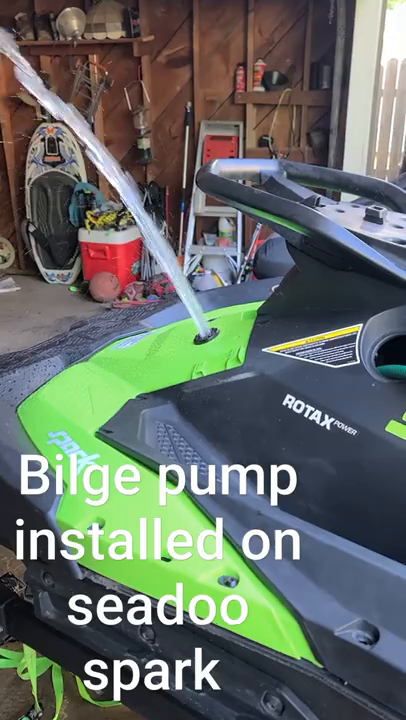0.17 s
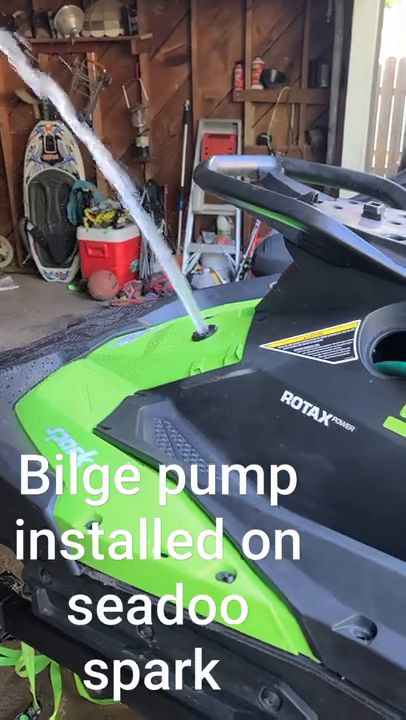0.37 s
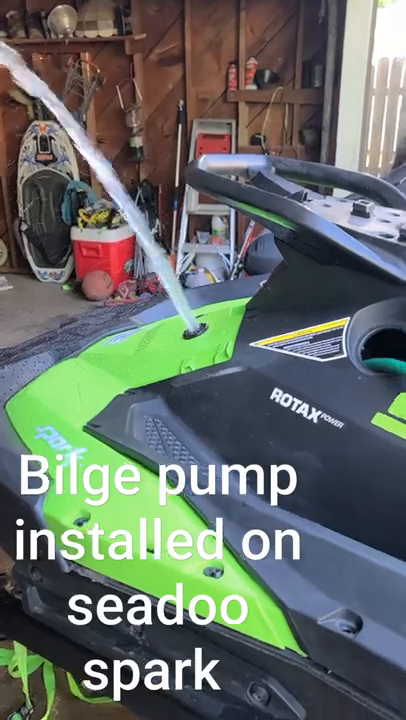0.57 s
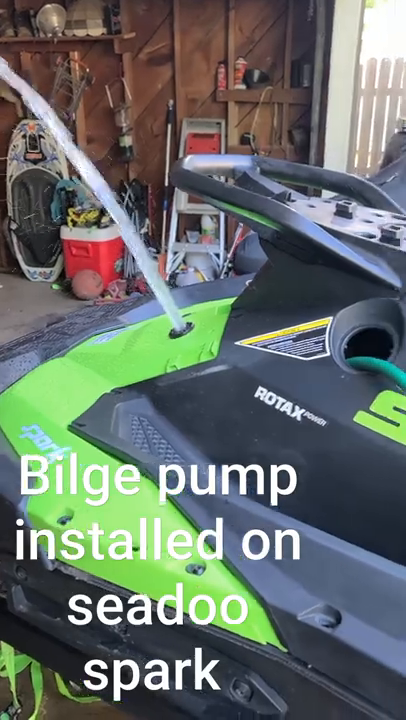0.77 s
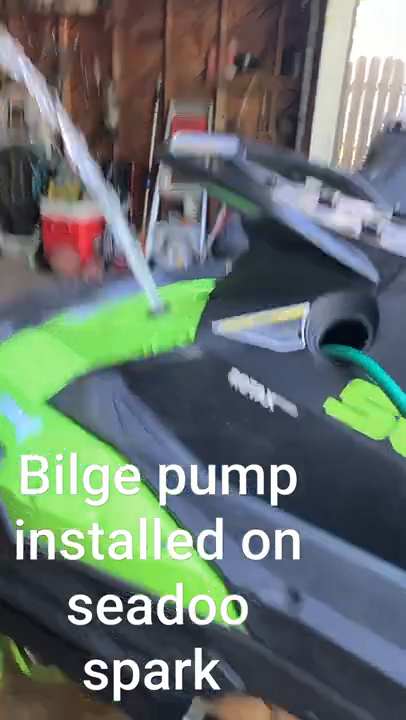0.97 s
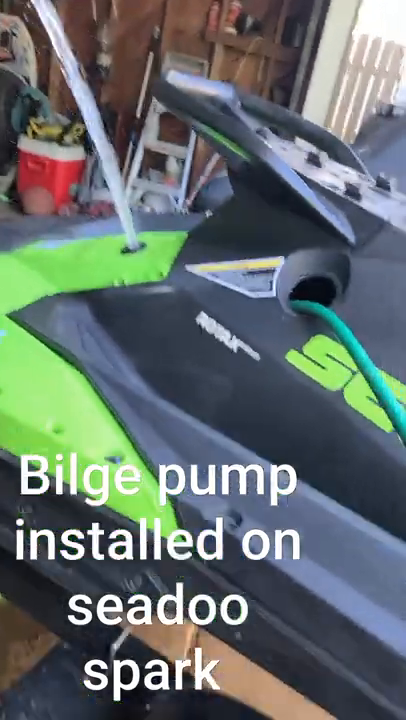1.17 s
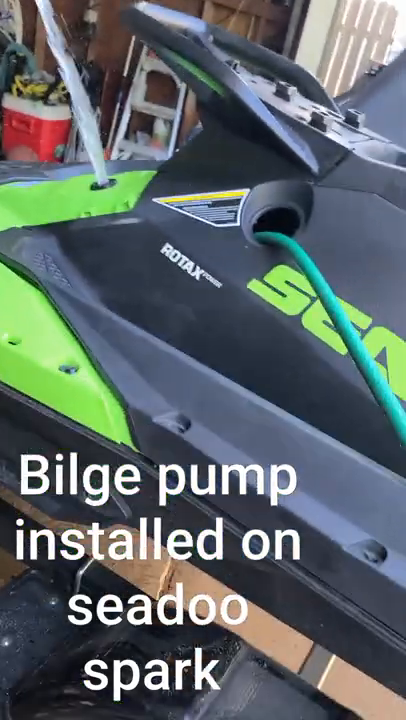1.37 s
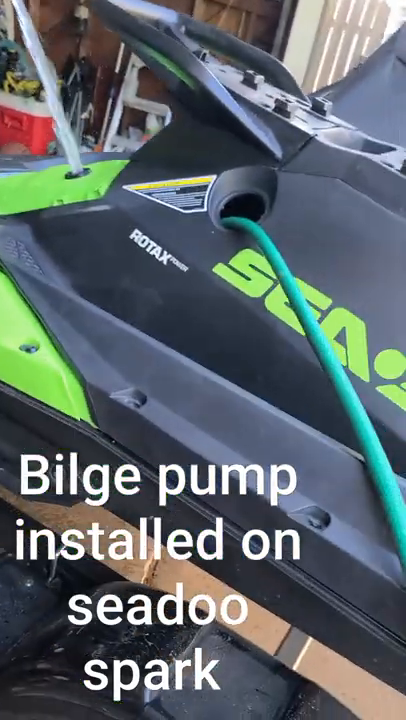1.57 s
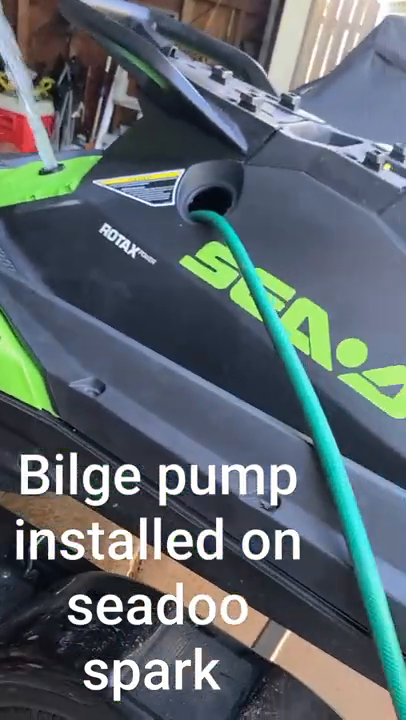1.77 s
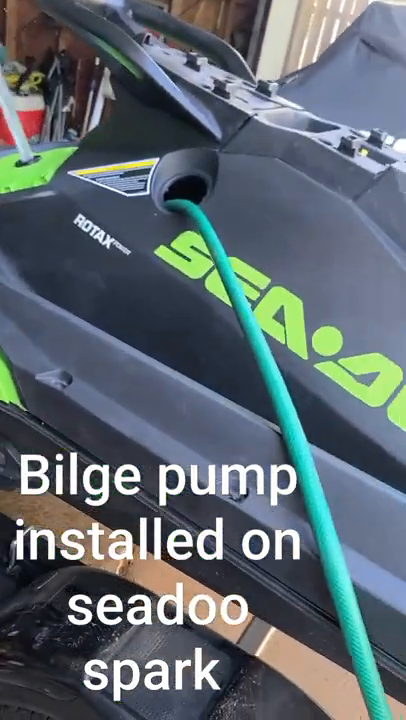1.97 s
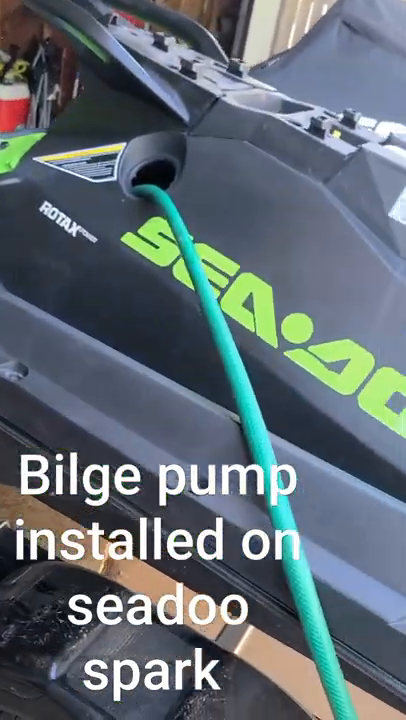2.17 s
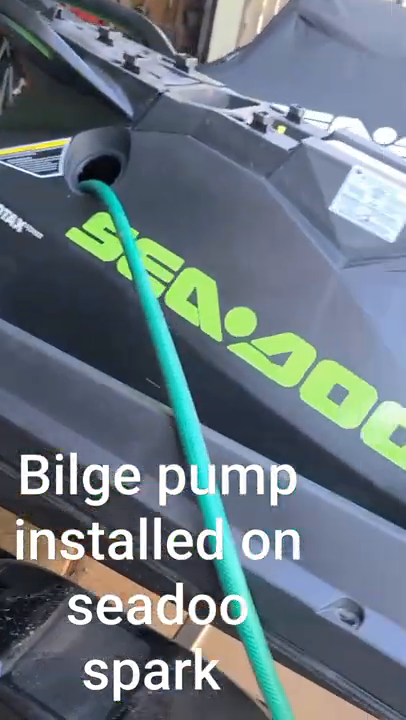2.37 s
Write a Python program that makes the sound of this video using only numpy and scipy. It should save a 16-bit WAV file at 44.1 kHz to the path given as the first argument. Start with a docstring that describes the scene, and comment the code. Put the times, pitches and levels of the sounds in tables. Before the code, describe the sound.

Water from a pump splashes continuously on concrete from 0 to 2.5 seconds, close and bright. Irregular slugs land many times a second, each a sharp crack and wet slap with a tiny bubbly gulp and scattering spatter, over steady spray hiss and droplet patter. Hard garage walls add diffuse echoes. Faint low hum swells come and go; the hand-held recorder is knocked at about 1.0 and 1.1 seconds.

```python
"""Hand-held stereo recorder close to a concrete garage floor, where a pump's arc of water breaks up and lands.
From the start fine spray hisses and droplets patter as short rings; slugs of water slap down throughout.
Each slug cracks, traps a gulp of air that rings briefly and throws spatter; the walls answer as decaying noise.
A low hum, a plain sine, then swells now and then, and later the recorder is knocked: a thud and a tick."""
import sys
import numpy as np
from scipy import signal
from scipy.io import wavfile
from scipy.ndimage import map_coordinates

SR = 44100
rng = np.random.default_rng(int(sys.argv[2]) if len(sys.argv) > 2 else 0)


def put_to_file(sound):
    """Save the sound as 16-bit audio at rate SR, in the file named by the first command-line argument."""
    columns = np.atleast_2d(sound).T  # one column per channel
    safe = np.clip(columns, -1, 1)
    whole_steps = np.round(safe * 32767)
    wavfile.write(sys.argv[1], SR, whole_steps.astype(np.int16))


N = 110691


def amp(db):
    """Decibels to amplitude."""
    return 10 ** (np.asarray(db) / 20)


def rms_one(x):
    """Scale to an RMS of 1."""
    return x / np.sqrt(np.mean(x ** 2) + 1e-20)


def at_hz(points, hz):
    """Read a (Hz, value) curve, straight along log frequency."""
    curve_hz, values = np.array(points).T
    return np.interp(np.log(hz), np.log(curve_hz), values)


def band(x, low_hz, high_hz):
    """Band-pass, kept inside the usable range."""
    edges = [max(low_hz, 10), min(high_hz, .45 * SR)]
    return signal.sosfilt(signal.butter(2, edges, "band", fs=SR, output="sos"), x)


def drift(rate_hz):
    """Smooth random wander of RMS 1: noise through two equal one-pole low-passes."""
    r = np.exp(-2 * np.pi * rate_hz / SR)
    wander = signal.lfilter([1], [1, -2 * r, r * r], rng.standard_normal(N + SR))
    return rms_one(wander[SR:])  # the first second lets the filter settle


def ring(clicks, hz, t60_s):
    """A resonator: a unit click sets a decaying sine of height 1 ringing."""
    r, w = amp(-60 / (t60_s * SR)), 2 * np.pi * hz / SR
    return signal.lfilter([0, np.sin(w)], [1, -2 * r * np.cos(w), r * r], clicks + 1e-18)


def clicks(start_s, level_db):
    """Single-sample clicks at the given times."""
    out = np.zeros(N)
    np.add.at(out, np.minimum((np.asarray(start_s) * SR).astype(int), N - 1), amp(level_db))
    return out


# Spectrum of fine spray and background noise: band_hz [Hz], density_db [dB per Hz, relative]
SPRAY_SPECTRUM = [(35, -3), (60, 8.5), (200, -4), (380, 4), (550, -4), (1200, -16), (2600, 2.5), (4000, -6),
                  (9000, -0.5), (11000, -34), (16000, -8)]
# How alike the left and right noise are: band_hz [Hz], likeness [0 unrelated, 1 same]
STEREO_LIKENESS = [(60, .85), (200, .58), (700, 0), (15000, 0)]
SPRAY_DB = -35  # RMS over both channels, before the stereo tilt


def spray(patchy_db):
    """Half-octave bands of stereo noise, each with its own level, flicker and likeness."""
    out, together = 0, drift(11.0)
    edges = 28 * 2 ** np.arange(0, 9.6, .5)
    white = rng.standard_normal((2, 2, N))  # neighbouring bands use different noise
    for k, (low, high) in enumerate(zip(edges, edges[1:])):
        mid, side = band(white[k % 2], low, high)
        hz = np.sqrt(low * high)
        alike = np.clip(at_hz(STEREO_LIKENESS, hz), -1, 1)
        flicker_db = patchy_db * min(1, hz / 1500) * (.5 * together + drift(66))
        gain = amp(at_hz(SPRAY_SPECTRUM, hz) + flicker_db)
        stereo = np.sqrt(1 + alike) * mid + np.sqrt(1 - alike) * side * [[1], [-1]]
        out = out + gain * stereo
    return amp(SPRAY_DB) * rms_one(out)


DROPS_PER_S, DROPS_DB, DROP_SPREAD_DB = 1100, -46, 1.5  # typical rate, overall RMS, spread of sizes
DROP_HZ = (1620, 14000)  # lowest_hz, highest_hz [Hz] of the ringing drops


def droplets():
    """Small drops land at random; each ring falls 60 dB in 3.7 cycles."""
    sizes = amp(DROP_SPREAD_DB * np.minimum(rng.exponential(1, N), 5)) * rng.choice([-1, 1], N)
    born = rng.random(N) < DROPS_PER_S * amp(2 * drift(8)) / SR
    pitches, dealt = np.geomspace(*DROP_HZ, 14), rng.integers(0, 14, N)
    rings = sum(ring(sizes * born * (dealt == k), hz, 3.7 / hz) for k, hz in enumerate(pitches))
    return amp(DROPS_DB) * rms_one(rings)


SPOTS = 4  # places on the floor where water lands, each with its own echoes
# Bands [Hz], trims added to the listed levels [dB], spatter against its burst [dB]
CRACK_HZ, CRACK_DB, CRACK_SPATTER_DB = (5880, 19100), -7.5, -15.5
SLAP_HZ, SLAP_DB, SLAP_SPATTER_DB = (2685, 6160), 4.5, -12.5
GULP_SPAN, GULP_DB, GULP_SPATTER_DB = (.58, 1.84), 4, -11.5  # band as multiples of the pitch
CRACK_S, SLAP_S, GULP_S, RISE_S = .0007, .0008, .0019, .0003  # decay times and the common rise
# The bubble climbs from this share of its pitch; tone is its strength against the noise
GULP_START, GULP_CLIMB_S, GULP_TONE = .6, .0012, 1.3
# Ringing drops per cycle of the band's low edge, their size spread, cycles to fall 60 dB, mist under them
SPATTER_PER_CYCLE, SPATTER_SPREAD_DB, SPATTER_CYCLES, SPATTER_MIST = .6, 2.5, 10, .7
SPATTER_S = 0.037  # decay time of the thrown spatter
# Slugs landing on the concrete, levels before the trims above:
# start_s [s], crack_db [dB], gulp_db [dB], slap_db [dB], pitch_hz [Hz, of the gulp]
SLUG_LANDINGS = [(0.002, -5, -23.5, -28, 1680), (0.027, -2, -20, -22.5, 1840),
                 (0.051, -11, -46, -29.5, 1200), (0.115, -2, -60, -27.5, 1910),
                 (0.146, -13.5, -61, -56, 1910), (0.211, -5, -29, -23, 1054),
                 (0.252, -10, -21.5, -27, 5100), (0.306, -27, -29.5, -28.5, 2320),
                 (0.3275, -4.5, -31, -45, 3720), (0.361, -8.5, -60, -41, 1900),
                 (0.386, -5, -26.5, -26.5, 2130), (0.41, -10.5, -26.5, -25.5, 1070),
                 (0.525, -1.5, -22, -23, 1210), (0.547, -3.5, -20.5, -23.5, 1500),
                 (0.631, -8.5, -29, -54, 2040), (0.652, -34, -19, -53, 2190),
                 (0.661, 0.5, -22.5, -40, 1420), (0.672, -33, -37, -48, 1450),
                 (0.688, -20, -25, -19.5, 975), (0.6935, -36, -20.5, -22.5, 1470),
                 (0.708, -4, -21.5, -37, 2180), (0.738, -2.5, -54, -23, 1330),
                 (0.758, -7.5, -29, -63, 2080), (0.892, -0.5, -64, -51, 1940),
                 (0.923, -8, -27.5, -27.5, 1740), (1.012, -7.5, -17, -27.5, 1404),
                 (1.036, -7, -27, -24, 1660), (1.047, -4, -36, -47, 1300), (1.092, -9, -25.5, -28.5, 1350),
                 (1.129, -5.5, -37, -47, 590), (1.165, -7, -19, -20.5, 1830), (1.199, -4.5, -22, -30, 1820),
                 (1.273, -9, -28, -27, 1400), (1.299, 5.5, -31, -32, 1680), (1.348, -6.5, -24.5, -27, 1407),
                 (1.389, -4.5, -61, -31, 1230), (1.455, -5.5, -47, -29.5, 1450),
                 (1.497, -42, -28, -75, 1000), (1.575, -4, -31, -30, 1700), (1.591, -23, -39, -29, 1570),
                 (1.613, -12, -25.5, -24, 1730), (1.629, -4, -60, -33, 1470), (1.678, -7, -26.5, -25, 1620),
                 (1.705, -3.5, -21, -22.5, 1770), (1.767, -16, -36.5, -29.5, 860),
                 (1.831, -1.5, -17.5, -30, 1156), (1.852, -22, -20.5, -42, 2538),
                 (1.864, -7.5, -32, -42, 880), (1.921, -9.5, -32, -53, 990), (1.981, -2, -22, -21, 1360),
                 (2.023, -38, -22, -35, 1410), (2.063, -5, -24.5, -23.5, 1640),
                 (2.088, -21, -28.5, -49, 1600), (2.152, -2.5, -30.5, -23.5, 1510),
                 (2.195, -6.5, -58, -20, 1790), (2.225, -1.5, -24, -34, 1230),
                 (2.256, -6, -27.5, -35, 2690), (2.336, -11.5, -28, -27, 2070), (2.397, -2, -23, -17, 1800),
                 (2.405, -2, -20, -43, 1945), (2.434, -2.5, -25, -26, 1790)]


def slugs():
    """Crack, slap and gulp are short bursts at one spot; ringing drops and mist follow, spread wide."""
    span = SR // 6
    blows, spatter = np.zeros((SPOTS, N + SR)), np.zeros((2, N + SR))
    t = np.arange(span) / SR
    climb = t - (1 - GULP_START) * GULP_CLIMB_S * (1 - np.exp(-t / GULP_CLIMB_S))
    for n, (start_s, crack_db, gulp_db, slap_db, pitch_hz) in enumerate(SLUG_LANDINGS):
        i = int(start_s * SR)
        bubble = GULP_TONE * np.sqrt(2) * np.sin(2 * np.pi * pitch_hz * climb)
        gulp_hz = pitch_hz * GULP_SPAN[0], pitch_hz * GULP_SPAN[1]
        parts = ((crack_db + CRACK_DB, CRACK_HZ, CRACK_S, CRACK_SPATTER_DB, 0),
                 (slap_db + SLAP_DB, SLAP_HZ, SLAP_S, SLAP_SPATTER_DB, 0),
                 (gulp_db + GULP_DB, gulp_hz, GULP_S, GULP_SPATTER_DB, bubble))
        for level_db, edges, decay_s, after_db, tone in parts:
            white = rng.standard_normal((3, span))
            # Most samples draw a number past the last pitch and so carry no drop
            draws = SR / (SPATTER_PER_CYCLE * edges[0]) * SPOTS
            dealt = (rng.random(span) * draws).astype(int)
            sizes = white[1:] * amp(SPATTER_SPREAD_DB * np.minimum(rng.exponential(1, span), 4))
            pitches = edges[0] * (edges[1] / edges[0]) ** rng.random(SPOTS)
            drops = sum(ring(sizes * (dealt == k), hz, SPATTER_CYCLES / hz)
                        for k, hz in enumerate(pitches))
            noise = np.array([rms_one(x) for x in band(band(white, *edges), *edges)])
            blow = (noise[0] + tone) * (1 - np.exp(-t / RISE_S)) * np.exp(-t / decay_s)
            blow_size = np.sqrt(2 * np.sum(blow ** 2) / (decay_s * SR))
            blows[n % SPOTS, i:i + span] += amp(level_db) * blow / blow_size
            thrown = SPATTER_MIST * noise[1:] + rms_one(band(band(drops, *edges), *edges))
            spatter[:, i:i + span] += amp(level_db + after_db) * thrown * np.exp(-t / SPATTER_S)
    return blows[:, :N], spatter[:, :N]


ROOM_GAP_S = 0.002  # silence before the first echo
# Garage echoes: band_hz [Hz], t60_s [s], level_db [dB against the direct sound]
ROOM_ECHOES = [(504, 0.69, -6.5), (2220, 0.25, -4), (12000, 1, -4.5)]


def garage(x):
    """Diffuse echoes: noise that dies band by band, unrelated in the two channels."""
    t, edges, tail = np.arange(SR // 2) / SR, 250 * 2 ** np.arange(7), 0
    white, room = rng.standard_normal((2, len(t))), np.array(ROOM_ECHOES)
    for low, high in zip(edges, edges[1:]):
        middle_hz = low * np.sqrt(2)
        t60_s = at_hz(room[:, :2], middle_hz)
        level_db = at_hz(room[:, ::2], middle_hz)
        fade = amp(-60 * t / t60_s) * (t > ROOM_GAP_S)
        tail = tail + amp(level_db) * band(white, low, high) * fade / np.sqrt(np.sum(fade ** 2))
    return signal.fftconvolve(x[None], tail, axes=1)[:, :N]


# Low hum swells: peak_s [s], level_db [dB], pitch_hz [Hz], rise_s [s], fall_s [s]
HUM_SWELLS = [(0.249, -33.5, 46.4, 0.077, 0.038), (1.026, -34.5, 58, 0.0079, 0.018),
              (1.421, -29.5, 45.4, 0.044, 0.041), (1.54, -35.5, 47.8, 0.053, 0.041),
              (2.302, -30.5, 45, 0.027, 0.048), (2.393, -37, 44, 0.046, 0.063)]


def swells():
    """Each swell is a low sine that grows and dies as a lopsided bell curve."""
    t, hum = np.arange(N) / SR, 0
    for peak_s, level_db, pitch_hz, rise_s, fall_s in HUM_SWELLS:
        since = t - peak_s
        bell = np.exp(-(since / np.where(since < 0, rise_s, fall_s)) ** 2)
        hum = hum + amp(level_db) * bell * np.sin(2 * np.pi * pitch_hz * since)
    return hum


KNOCK_HZ, KNOCK_T60_S = 324, 0.029  # ring of the casing
TICK_HZ = (730, 4900)  # low_hz, high_hz [Hz] of the tick
# Knocks on the recorder, levels before the left-right tilt: start_s [s], thud_db [dB], tick_db [dB]
RECORDER_KNOCKS = [(1.0129, -24.5, -10.5), (1.111, -23, -8)]


def knocks():
    """A dull ringing thud of the casing and a dry band-passed tick, louder on the right."""
    start_s, thud_db, tick_db = np.transpose(RECORDER_KNOCKS)
    tick = -band(clicks(start_s, tick_db), *TICK_HZ) * SR / 2 / TICK_HZ[1]
    thud = ring(clicks(start_s, thud_db), KNOCK_HZ, KNOCK_T60_S)
    return (thud + tick) * amp([[-3], [3]])


RIGHT_DB = 0.79  # the right side is nearer: raised by this, the left lowered by as much
# The recorder turns, so the left microphone's delay changes: time_s [s], lag_s [s]
LEFT_LAG = [(0, 0.00024), (2.51, 0.000093)]


def scene():
    """Place the water before the two microphones, with its echoes, spray, hum and knocks."""
    t = np.arange(N) / SR
    mist = spray(patchy_db=4.0)
    drops = droplets()
    blows, spatter = slugs()
    water, right = blows.sum(0) + drops, amp(RIGHT_DB)
    lag_s = np.interp(t, *np.transpose(LEFT_LAG))
    late = map_coordinates(water, [np.arange(N) - SR * lag_s], order=3)
    echoes = sum(garage(x) for x in blows) + garage(drops + spatter.mean(0))
    wide = np.array([late, water]) + spatter + echoes + mist
    return wide * [[1 / right], [right]] + swells() + knocks()


MIC_PEAK_HZ, MIC_PEAK = (8130, 9530), 0.26  # presence peak of the microphones: band, share added
CUTOFF_HZ = 16700  # from here up the top is 60 dB down


def record(dry):
    """The microphones add a presence peak; overload clips; the top is cut."""
    bright = dry + MIC_PEAK * band(dry, *MIC_PEAK_HZ)
    clipped = np.clip(bright, -.95, .95)
    return signal.sosfilt(signal.cheby2(12, 60, CUTOFF_HZ, fs=SR, output="sos"), clipped)


dry = scene()
out = record(dry)
put_to_file(out)
```